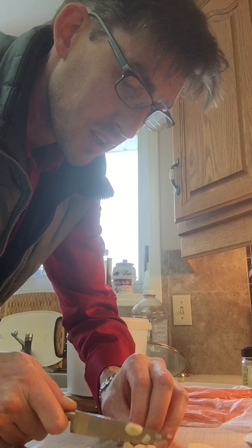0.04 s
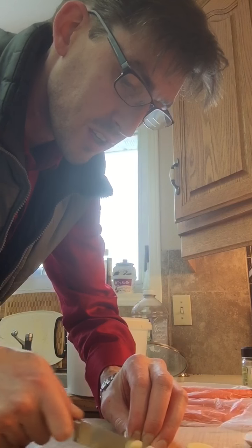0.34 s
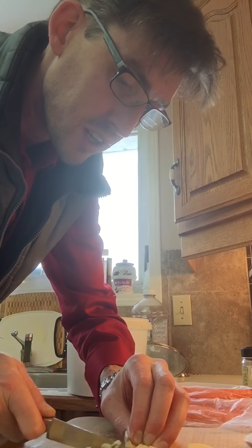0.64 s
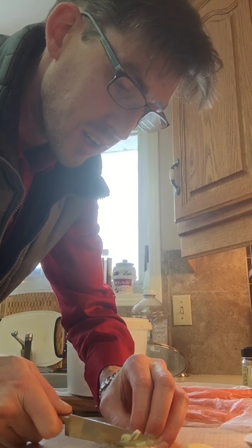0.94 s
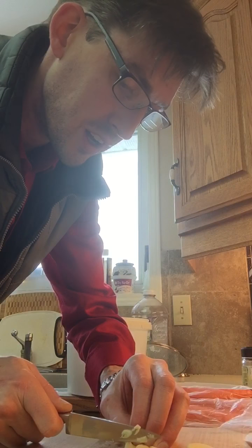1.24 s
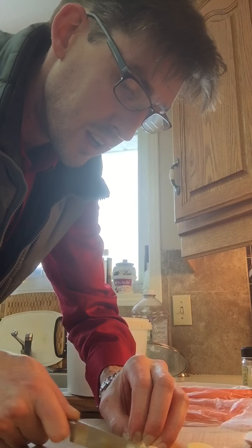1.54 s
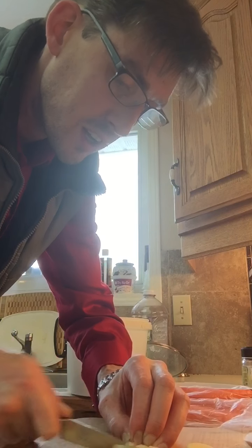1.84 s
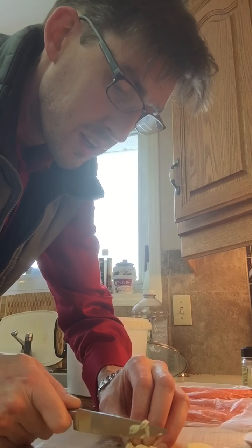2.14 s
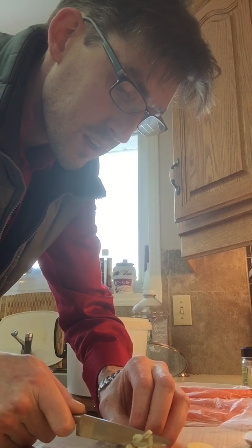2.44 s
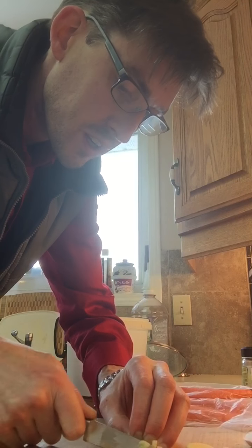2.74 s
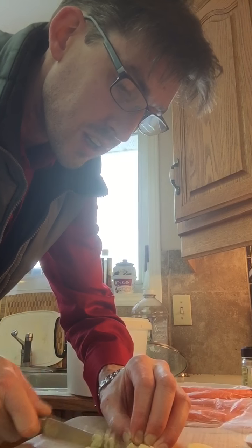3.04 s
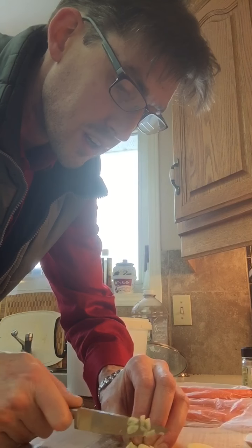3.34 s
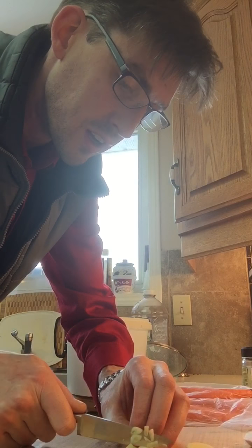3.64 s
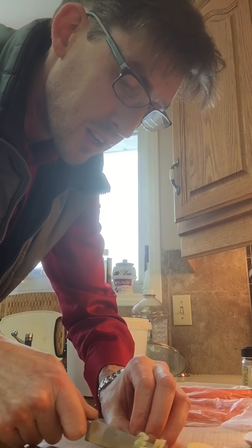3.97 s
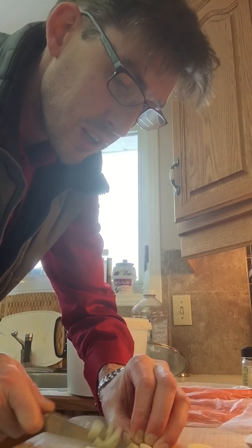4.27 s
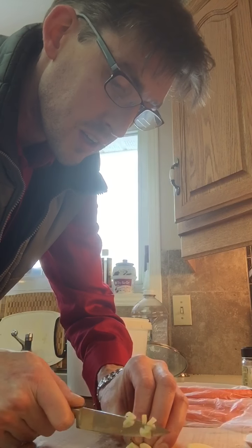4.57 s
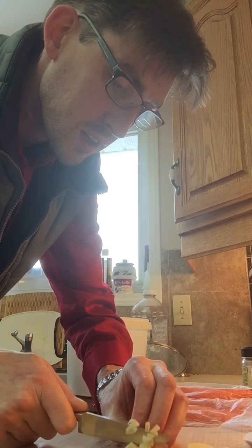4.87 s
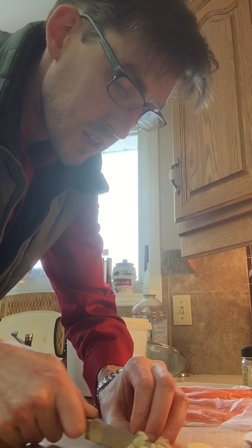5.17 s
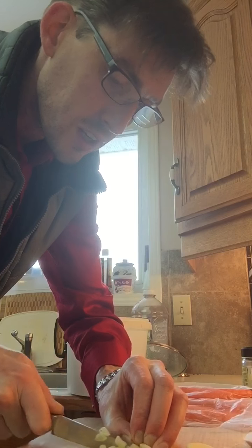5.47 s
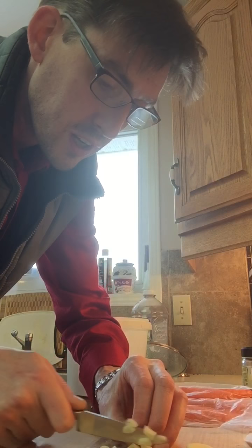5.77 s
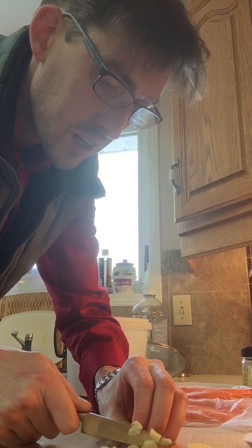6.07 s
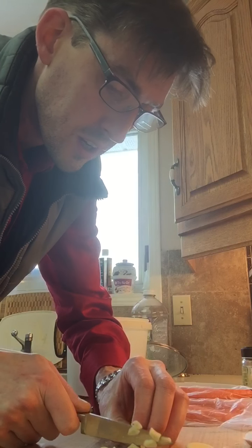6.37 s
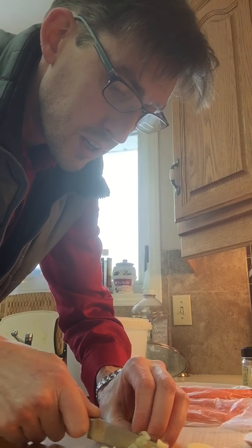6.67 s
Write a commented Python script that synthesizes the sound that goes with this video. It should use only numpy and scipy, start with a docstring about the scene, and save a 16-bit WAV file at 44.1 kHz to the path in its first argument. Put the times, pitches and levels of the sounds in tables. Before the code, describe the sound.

Uneven crunches, wooden knocks and light scrapes as a knife slices garlic cloves on a cutting board, with faint sticky ticks between.

```python
"""Soft taps, low thuds and sticky ticks on a wooden board: a knife cuts garlic in a small, quiet kitchen.
Blade and hand nudge the board, which rocks on the counter; juice films snap as pieces leave the steel.
The blade cracks and crunches through each clove; three times it breaks through and knocks hard,
ringing the board. Between cuts it drags over the wood, rasping and smearing the juice."""
import sys
import numpy as np
from scipy import signal
from scipy.fft import rfft, irfft
from scipy.io import wavfile

SR = 44100
rng = np.random.default_rng(int(sys.argv[2]) if len(sys.argv) > 2 else 0)


def persist_wave(psi):
    """Save psi, clipped to +-1, as 16-bit WAV."""
    counts = np.round(np.clip(psi, -1, 1) * 32767).astype(np.int16)
    wavfile.write(sys.argv[1], SR, np.atleast_2d(counts).T)


N = 300321
TIME = np.arange(N) / SR

# Blade or hand meets the board. Each row: time in seconds, push in dB, hardness (0 padded, 1 steel).
CONTACTS = [(0.0, -30, 0.24), (0.092, -37.5, 0.51), (0.155, -37, 0), (0.28, -38.5, 0.79), (.612, -29.5, 0),
            (0.749, -36, 0.6), (0.844, -37.5, 0), (.9, -30, 0.09), (0.973, -36.5, 0), (1.546, -41.5, 0.064),
            (1.607, -19, 0.79), (1.624, -17.5, 0.41), (1.691, -27, 0.72), (1.714, -30, 1),
            (1.794, -37, 0.75), (1.876, -25, 0.23), (2.042, -33.5, 0.75), (2.057, -24.5, .35),
            (2.105, -23, 0.58), (2.136, -27, 0.24), (2.172, -28, 0.37), (2.194, -30, 0.37),
            (2.329, -25.5, 0.23), (2.393, -31.5, 0.53), (3.015, -32.5, 0.62), (3.123, -26.5, 0.45),
            (3.191, -23, 0.44), (3.285, -27.5, 0.45), (3.298, -23, 0.39), (3.435, -38, 0),
            (3.545, -30.5, 0.34), (3.592, -37.5, 0.53), (4.255, -26, 0.59), (4.304, -23.5, 0.74),
            (4.336, -20.5, 0.53), (4.403, -23, 0.69), (4.474, -29, .3), (4.542, -26, 0.32),
            (4.989, -35, 0.38), (5.213, -19, 0.27), (5.255, -27.5, 1), (5.515, -32.5, 0), (5.58, -40, 0.93),
            (5.594, -28, 0.7), (5.656, -30, 0.12), (5.857, -28, 0), (6.446, -36, 0.43), (6.464, -41, 0.85),
            (6.689, -29.5, 0.99)]
# How busily the wet pieces are shifted. Each row: time in seconds, crackle level in dB.
HANDLING = [(0,-69),(.9,-69),(1.15,-84),(1.55,-85.5),(1.72,-67),(2.4,-73),(2.6,-80.5),(3.3,-69.5),(3.75,-78.5),(4.4,-73),(4.75,-70.5),(5.3,-83),(5.8,-74),(6.1,-76.5),(6.4,-87.5),(6.8,-84.5)]
# Fracture heard straight from the flesh. Each row: frequency in Hz, level in dB.
SNAP_SPECTRUM = [(500, -24), (2500, -4), (4000, -7), (6000, 3), (8000, -4.5), (11000, -13.5),
                 (16000, -15.5)]
# Blade sinks into a clove. Each row: start and length in seconds, then crunch, crack and snap in dB.
CUTS = [(.369, .034, -42.5, -37, -37.5), (0.404, 0.039, -33, -24.5, -29.5), (1.607, 0.063, -45.5, -31, -36),
        (2.684, 0.035, -44, -29, -41), (2.723, 0.092, -36, -28, -31.5), (3.84, 0.025, -42.5, -33.5, -56),
        (3.896, 0.087, -38.5, -21, -33), (5.148, 0.039, -49.5, -38.5, -56),
        (5.191, 0.086, -37.5, -17.5, -29.5), (5.445, 0.015, -52, -32.5, -37),
        (6.656, 0.067, -37.5, -26.5, -34.5)]
# Blade lands hard. Each row: time in seconds, strength in dB, contact cut-off in Hz.
KNOCKS = [(0.4405, 2, 8300), (2.7768, 1.5, 5400), (3.9656, -1.9, 4300)]
# Blade drags over the wood. Each row: start and end in seconds, rasp in dB, wet hiss in dB.
DRAGS = [(0.557,0.734,-60,-60.5),(1.66,1.852,-67,-62),(1.81,2.013,-57,-55),(2.21,2.404,-93,-66),(2.899,3.12,-57,-57),(4.09,4.307,-56,-58),(5.356,5.514,-58,-54.5),(6.45,6.546,-63.5,-69)]


def from_db(db):
    """Decibels to gain."""
    return 10 ** (np.asarray(db) / 20)


def rms_one(x):
    """Scale to unit rms."""
    return x / np.sqrt(np.mean(x ** 2) + 1e-20)


def at_hz(points, hz):
    """Read a table on a log-frequency axis."""
    table = np.array(points)
    return np.interp(np.log(np.maximum(hz, 1)), np.log(table[:, 0]), table[:, 1])


def add(track, start_s, sound):
    """Mix a sound into the track."""
    i = max(0, round(start_s * SR))
    track[i:i + len(sound)] += sound[:max(0, N - i)]


def impulse(spectrum, size=4096):
    """Minimum-phase click with this spectrum; peak 1."""
    bins_hz = np.arange(size // 2 + 1) * SR / size
    cepstrum = irfft(np.log(from_db(at_hz(spectrum, bins_hz))))
    cepstrum[1:size // 2] *= 2
    cepstrum[size // 2 + 1:] = 0
    click = irfft(np.exp(rfft(cepstrum)))
    return click / np.abs(click).max()


def through(x, response):
    """Convolve, keeping the length."""
    return signal.fftconvolve(x, response)[:len(x)]


def lowpass(x, cutoff_hz, order):
    """Maximally flat low-pass."""
    return signal.sosfilt(signal.butter(order, cutoff_hz, fs=SR, output="sos"), x)


def decay(t60_s, size):
    """Exponential envelope."""
    return from_db(-60 * TIME[:size] / t60_s)


def burst(click, t60_s, scatter, size=8192):
    """One contact and a dying scatter of further ones; peak 1."""
    hits = scatter * rng.standard_normal(size) * decay(t60_s, size)
    hits[0] = 1
    sound = through(hits, click)
    return sound / np.abs(sound).max()


def grains(spectrum, per_s, spread_db):
    """Stream of tiny clicks of uneven size; rms 1."""
    sizes = from_db(spread_db * np.minimum(rng.exponential(1, N), 4)) * rng.choice([-1, 1], N)
    fires = rng.random(N) < per_s / SR
    return rms_one(through(sizes * fires, impulse(spectrum)))


def swell(start_s, end_s):
    """Envelope eased in and out."""
    return signal.windows.tukey(max(8, int((end_s - start_s) * SR)), alpha=0.93)


def board_ring(spread_db, size):
    """One blow on the board; the spot hit sets how strongly each mode rings."""
    # Board and blade. Each row: frequency in Hz, level in dB, t60 in seconds.
    modes = [(103, -25, .156), (174, -22, .17), (241, -24, .059), (329, -27, .061), (402, -26.5, .079),
             (468, -29, .058), (597, -15.5, .054), (726, -12, .062), (800, -15, .065), (857, -14.5, .063),
             (945, -20.5, .068), (1046, -14.5, .055), (1143, -14.5, .074), (1266, -17.5, .035),
             (1550, -17.5, .046), (2045, -22.5, .034), (2598, -15, .05), (2714, -15, .037),
             (2946, -16, .037), (3121, -14, .043), (3698, -16, .037), (3919, -12, .036), (4083, -15, .028),
             (4290, -19.5, .033), (4835, -27, .02), (6103, -15, .025), (6635, -21, .02),
             (7154, -16.5, .026), (8840, -21, .021), (9924, -16, .013)]
    hz, level_db, t60_s = np.transpose(modes)
    signs = (-1) ** np.arange(len(hz))  # opposed neighbours: the ring takes a moment to build
    gains = signs * from_db(level_db + rng.normal(0, spread_db, len(hz)))
    partials = decay(t60_s[:, None], size) * np.sin(2 * np.pi * hz[:, None] * TIME[:size])
    return gains @ partials


def taps(tap_db=-4.0, rub_db=1.2, padded_hz=420, hard_octaves=1.3, hard_db=18, size=4096):
    """Slow contacts ring the low modes; the blade damps them and rubs. Harder is brighter and louder."""
    # Each row: frequency in Hz, level in dB.
    rub_spectrum = [(100,-19),(300,-5.5),(480,11),(750,-2.5),(1100,-12.5),(1450,-9),(2000,-12.5),(3000,-24.5),(5000,-48),(16000,-71.5)]
    out, rub_click = np.zeros(N), impulse(rub_spectrum)
    for s, push_db, hardness in CONTACTS:
        db = push_db + hard_db * (hardness - 1)
        contact_hz = padded_hz * 2 ** (hard_octaves * hardness)
        ring = board_ring(spread_db=3.5, size=size) * decay(t60_s=0.07, size=size)
        ring = lowpass(ring, contact_hz, order=4)
        add(out, s, from_db(db + tap_db) * ring / np.abs(ring).max())
        rub = burst(rub_click, t60_s=0.06, scatter=0.3)
        add(out, s, from_db(db + rub_db) * lowpass(rub, 2 * contact_hz, order=4))
    return out


def strays(per_s, over_db, spread_db, count=100):
    """Chance events that follow the handling level. Each row: time in seconds, level in dB."""
    times_s = (np.arange(count) + rng.random(count)) / per_s
    handling_db = np.interp(times_s, *np.transpose(HANDLING))
    levels_db = handling_db + over_db + spread_db * rng.standard_normal(count)
    return [(s, db) for s, db in zip(times_s, levels_db) if s < TIME[-1]]


def pushes(rock_hz=173.2, pressed_hz=194, sliding_hz=160):
    """Loads on the board. Each row: time in seconds, level in dB, rocking in Hz, extra shake in dB."""
    rock_lag_s, settle_lag_s, give_lag_s, slip_gap_s = 0.0033, 0.024, 0.012, 0.024
    settle_db, knock_db, cut_db, judder_db, shake_db = -12.5, -23.5, 12, 22, 3.5
    rows = [(s + rock_lag_s, db, rock_hz, 0) for s, db, _ in CONTACTS]
    rows += [(s + settle_lag_s, db + settle_db, sliding_hz, 0) for s, db, _ in CONTACTS]
    rows += [(s + give_lag_s, db + knock_db, rock_hz, shake_db) for s, db, _ in KNOCKS]
    rows += [(s + give_lag_s, db + cut_db, pressed_hz, shake_db) for s, _, db, _, _ in CUTS]
    for start_s, end_s, db, _ in DRAGS:
        slips_s = start_s + np.cumsum(slip_gap_s * rng.uniform(0.31, 1.2, size=12))
        for s in slips_s[slips_s < end_s]:
            pressure_db = 20 * np.log10(np.sin(np.pi * (s - start_s) / (end_s - start_s)))
            rows.append((s, db + judder_db + pressure_db, sliding_hz, shake_db))
    finger_bumps = strays(per_s=6, over_db=23.5, spread_db=3.0)
    return rows + [(s, db, sliding_hz, 0) for s, db in finger_bumps]


def nudges(thud_db=1.67, counter_db=-7.0, peak_s=0.011, steepness=2.2, pitch_spread=0.08, size=8192):
    """Each push rocks the board for a few cycles and shakes the counter."""
    # Each row: frequency in Hz, level in dB.
    counter_spectrum = [(25,-38),(45,-19),(70,-4),(105,0),(135,-6),(190,-3),(260,-3),(400,-13),(900,-45),(16000,-80)]
    out, t, counter_click = np.zeros(N), TIME[:size], impulse(counter_spectrum)
    envelope = (t / peak_s * np.exp(1 - t / peak_s)) ** steepness
    for s, db, nominal_hz, shake_db in pushes():
        hz = nominal_hz * (1 + pitch_spread * rng.standard_normal())
        thud = from_db(thud_db) * envelope * np.sin(2 * np.pi * hz * t)
        shake = from_db(counter_db + shake_db) * burst(counter_click, t60_s=0.065, scatter=0.8)
        add(out, s, from_db(db) * (thud + shake))
    return out


def room_air(level_db=-64):
    """Still air: faint, steady, mostly low noise."""
    # Each row: frequency in Hz, level in dB.
    air_spectrum = [(15, -48), (25, -18), (80, -2.5), (170, -6), (206, -7), (249, -11.5), (309, -22.5),
                    (476, -13.5), (775, -20.5), (3430, -26.5), (4030, -24), (4870, -30), (6740, -30),
                    (12900, -37.5), (16000, -37.5)]
    return from_db(level_db) * rms_one(through(rng.standard_normal(N), impulse(air_spectrum)))


def sticky_ticks(tick_db=1.5, cluster_db=-22.5, half_span_s=0.01):
    """Juice films snap, each amid fainter ticks; shifting the pieces adds stray ticks and crackle."""
    # Garlic parts from the steel. Each row: time in seconds, level in dB.
    partings = [(0.1103, -30.5), (0.2652, -28), (.5326, -30.5), (0.6798, -29.5), (.8068, -31),
                (0.859, -37.5), (0.9315, -31.5), (1.7305, -31.5), (1.8389, -31), (2.0874, -35),
                (2.2317, -30.5), (2.3178, -36), (2.3808, -38), (3.0444, -36.5), (3.34, -34.5),
                (3.4397, -32.5), (4.1645, -34), (4.3614, -31), (4.4332, -33), (4.5266, -31), (4.6865, -32),
                (4.7507, -35.5), (4.9328, -32), (5.0504, -41.5)]
    # Each row: frequency in Hz, level in dB.
    film_spectrum = [(500,-48),(2500,-36),(4000,-22),(5200,-16),(6600,0),(9500,-1),(12000,-8),(16000,-13)]
    out, cluster_gain = np.zeros(N), np.zeros(N)
    for s, db in partings + strays(per_s=12, over_db=20, spread_db=8.0):
        shift_octaves = rng.uniform(-0.2, 0.08)  # a larger film snaps lower
        click = impulse([(hz * 2 ** shift_octaves, band_db) for hz, band_db in film_spectrum])
        add(out, s, from_db(db + tick_db) * burst(click, t60_s=0.0025, scatter=0.54))
        envelope = swell(s - half_span_s, s + half_span_s)
        add(cluster_gain, s - half_span_s, from_db(db + cluster_db) * envelope)
    handling_gain = from_db(np.interp(TIME, *np.transpose(HANDLING)))
    crackle = handling_gain * grains(film_spectrum, per_s=590, spread_db=6.5)
    clusters = cluster_gain * grains(SNAP_SPECTRUM, per_s=1900, spread_db=1.5)
    return out + clusters + crackle


def squeeze(start_s, end_s):
    """A cut takes hold quickly and eases off as the clove gives way."""
    progress = np.linspace(0, 1, max(8, int((end_s - start_s) * SR)))
    return np.interp(progress, [0, 0.08, 0.6, 1], [0, 1, 1, 0.1])


def cracks(gap_s=0.0125, jitter=0.15, cut_share=0.42):
    """Fractures early in each cut. Each row: time in seconds, crack in dB, snap in dB."""
    rows = []
    for start_s, length_s, _, crack_db, snap_db in CUTS:
        gaps_s = gap_s * np.exp(jitter * rng.standard_normal(size=8))
        delays_s = np.cumsum(gaps_s) - gaps_s[0]
        rows += [(start_s + s, crack_db, snap_db) for s in delays_s if s < cut_share * length_s]
    return rows


def cutting(wood_db=-13.0, direct_db=5.5, crunch_db=-0.5, juice_db=-9.0, lead_s=0.003, size=4096):
    """A clove splits in a few sharp cracks that jolt the board, with cells bursting in between."""
    # Fracture heard through the board. Each row: frequency in Hz, level in dB.
    body_spectrum = [(50,-16.5),(170,3),(320,-14),(430,1),(530,-4),(740,5),(1100,-9),(1550,-9),(2300,-14),(2620,-9.5),(3300,-28.5),(6000,-30.5),(16000,-51)]
    out, pressure = np.zeros(N), np.zeros(N)
    body, snap = impulse(body_spectrum), impulse(SNAP_SPECTRUM)
    for s, crack_db, snap_db in cracks():
        jolt = board_ring(spread_db=2.5, size=size) * decay(t60_s=0.027, size=size)
        add(out, s, from_db(crack_db + wood_db) * jolt / np.abs(jolt).max())
        add(out, s, from_db(crack_db) * burst(body, t60_s=0.028, scatter=0.43))
        add(out, s, from_db(snap_db + direct_db) * burst(snap, t60_s=0.012, scatter=0.6))
    for s, length_s, db, _, _ in CUTS:
        add(pressure, s - lead_s, from_db(db + crunch_db) * squeeze(s - lead_s, s + length_s))
    cells = grains(body_spectrum, per_s=3500, spread_db=5.5)
    juice = from_db(juice_db) * grains(SNAP_SPECTRUM, per_s=5400, spread_db=4.0)
    return out + pressure * (cells + juice)


def knocks(ring_db=-0.53, bite_db=-7.0, size=16384):
    """Each landing rings the board; a blade cushioned by garlic sounds duller."""
    # The edge bites into the wood. Each row: frequency in Hz, level in dB.
    bite_spectrum = [(100, -17.5), (400, -9), (750, 4), (1200, -1), (1900, -20.5), (2350, -18.5),
                     (2900, -4), (4000, -1), (5000, -12.5), (7000, -6), (11000, -15.5), (16000, -15)]
    out, bite_click = np.zeros(N), impulse(bite_spectrum)
    for s, db, contact_hz in KNOCKS:
        ring = from_db(ring_db) * board_ring(spread_db=3, size=size)
        bite = from_db(bite_db) * burst(bite_click, t60_s=0.047, scatter=0.92, size=size)
        add(out, s, from_db(db) * lowpass(ring + bite, contact_hz, order=2))
    return out


def stick_slip(step_s=0.005, spread_db=3.5):
    """Friction flutters as the edge sticks and slips; rms 1."""
    knots_s = np.arange(0, TIME[-1], step_s)
    flutter_db = np.interp(TIME, knots_s, rng.normal(0, spread_db, len(knots_s)))
    return rms_one(from_db(flutter_db))


def drags(blade_db=2.5, smear_db=-1.5, catches_per_s=350):
    """The edge catches on the wood grain, ringing the blade, and smears the juice."""
    # Each row: frequency in Hz, width in Hz, level in dB.
    blade_modes = [(840, 120, 8), (1090, 490, 0), (1602, 55, 6), (2660, 32, 2), (3930, 150, 1.5),
                   (5540, 77, -47), (6340, 79, -1), (7100, 230, -12), (9350, 390, -13)]
    # Dull friction and smeared juice. Each row: frequency in Hz, level in dB.
    rasp_spectrum = [(60,38),(180,-10),(320,-31.5),(400,-2),(800,15),(1400,-15.5),(2200,13),(4000,-38),(8000,-65),(16000,-44)]
    hiss_spectrum = [(1000, 4), (3500, 2.5), (6500, 10), (9500, 1.5), (13000, -1.5), (16000, -3)]
    rasp_gain, hiss_gain, ring = np.zeros(N), np.zeros(N), np.zeros(N)
    for start_s, end_s, rasp_db, hiss_db in DRAGS:
        pressure = swell(start_s, end_s)
        add(rasp_gain, start_s, from_db(rasp_db) * pressure)
        add(hiss_gain, start_s, from_db(hiss_db + smear_db) * pressure)
    catches = rng.standard_normal(N) * (rng.random(N) < catches_per_s / SR)
    for k, (hz, width_hz, db) in enumerate(blade_modes):
        resonator = signal.iirpeak(hz, hz / width_hz, fs=SR)
        ring += (-1) ** k * from_db(db) * signal.lfilter(*resonator, catches)
    rasp = from_db(blade_db) * rms_one(ring) + grains(rasp_spectrum, per_s=3600, spread_db=4.0)
    flutter = stick_slip()
    hiss = grains(hiss_spectrum, per_s=4000, spread_db=3.5)
    return flutter * (rasp_gain * rasp + hiss_gain * hiss)


def kitchen_reverb(x, build_s=0.004, size=32768):
    """Reflections from counter and cupboards build up and die away band by band."""
    # Each row: frequency in Hz, level in dB.
    tail_spectrum = [(100, -4.5), (200, -7), (450, -13), (1000, -11), (2000, -21), (3500, -14), (7000, -18),
                     (14000, -22.5)]
    # Each row: frequency in Hz, t60 in seconds.
    decay_times = [(100, .2), (400, 0.25), (1000, 0.28), (4000, 0.27), (8000, .27), (15000, .18)]
    tail, onset = np.zeros(size), 1 - np.exp(-TIME[:size] / build_s)
    edges_hz = np.geomspace(50, 17000, 13)
    for low_hz, high_hz in zip(edges_hz, edges_hz[1:]):
        hz = np.sqrt(low_hz * high_hz)
        envelope = decay(at_hz(decay_times, hz), size) * onset
        bandpass = signal.butter(2, [low_hz, high_hz], "band", fs=SR, output="sos")
        band = signal.sosfilt(bandpass, rng.standard_normal(size))
        tail += from_db(at_hz(tail_spectrum, hz)) * band * envelope / np.sqrt(np.sum(envelope ** 2))
    return through(x, tail)


def scene(tick_send_db=-6.0):
    """Work on the board, its reflections and the still air; mono."""
    board = knocks() + cutting() + drags() + taps() + nudges()
    ticks = sticky_ticks()
    to_walls = board + from_db(tick_send_db) * ticks  # the hands screen the ticks
    return (board + ticks + room_air() + kitchen_reverb(to_walls))[None, :]


def record(dry):
    """Round the highest peaks and cut the top treble."""
    ceiling, cutoff_hz = 1.2, 16100
    rounded = ceiling * np.tanh(dry / ceiling)
    return signal.sosfilt(signal.ellip(10, 0.2, 80, cutoff_hz, fs=SR, output="sos"), rounded)


dry = scene()
out = record(dry)
persist_wave(out)
```